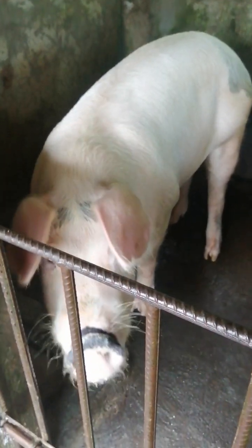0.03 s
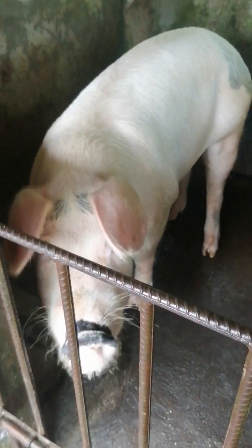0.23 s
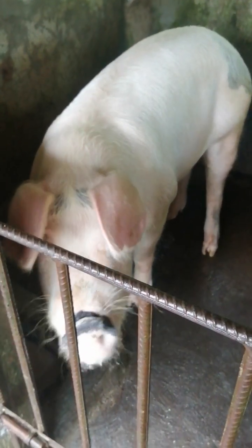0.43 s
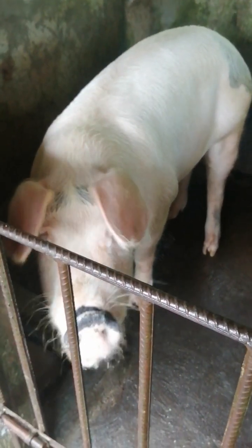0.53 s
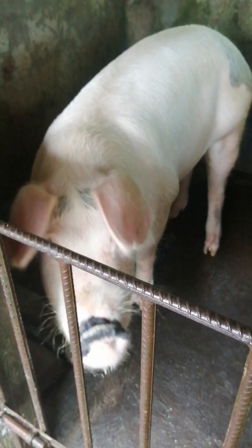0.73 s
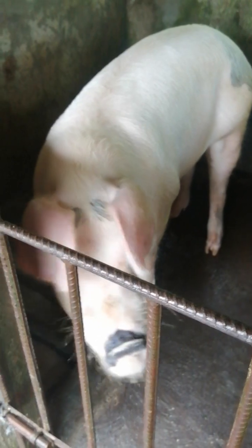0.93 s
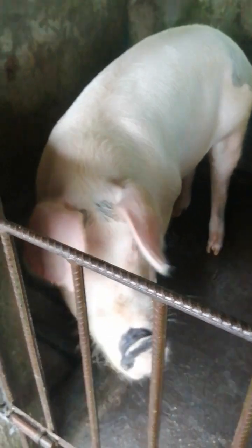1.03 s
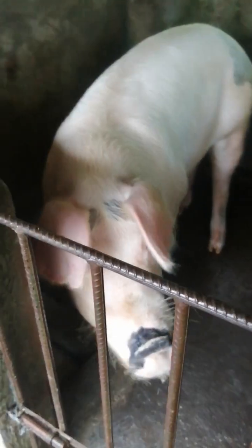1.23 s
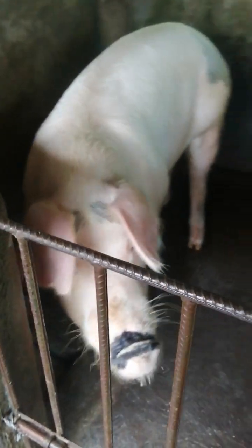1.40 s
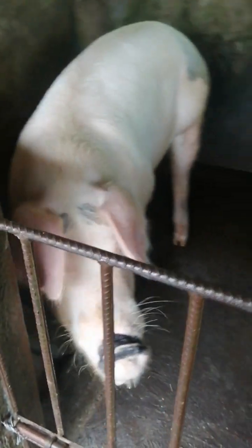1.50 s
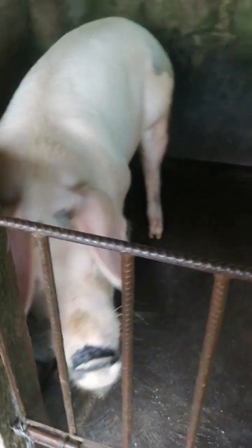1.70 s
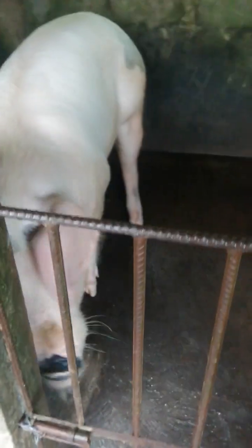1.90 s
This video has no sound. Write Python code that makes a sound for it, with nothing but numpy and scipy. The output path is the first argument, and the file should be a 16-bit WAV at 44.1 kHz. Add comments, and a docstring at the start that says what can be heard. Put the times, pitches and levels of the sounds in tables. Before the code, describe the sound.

A pig grunts close to the microphone in a small concrete pen. One short, throaty grunt is followed by a squeaky sniff, then two more grunts and a brief rustle, over faint hiss, ticks and small knocks.

```python
"""A pig in a small concrete pen, close to a handheld microphone with two unlike ports.
Shifting yard hiss, treble ticks and small knocks run from the start. At 0.2 s a short breath opens the
first grunt, a slow run of flaps in the throat that ends in a bright snap. A nostril squeak at 0.5 s
leads into a sniff. Two more grunts snap at 0.9 and 1.3 s, and from 1.7 s a rustle swells to the end."""
import sys
import numpy as np
from scipy import signal
from scipy.fft import rfft, irfft
from scipy.io import wavfile
from scipy.ndimage import uniform_filter1d

SR = 44100
rng = np.random.default_rng(int(sys.argv[2]) if len(sys.argv) > 2 else 0)


def to_wav(sig):
    """Store sig (one row per channel, or 1-D mono) as 16-bit WAV at the path in sys.argv[1].

    Samples outside -1..1 are clipped; the rate is SR.
    """
    pcm = np.clip(np.atleast_2d(sig), -1, 1) * 32767
    pcm = np.round(pcm).astype(np.int16)
    wavfile.write(sys.argv[1], SR, pcm.T)  # frames by channels


N = 85995
FRAMES, BIN_HZ = N // 128 + 5, np.fft.rfftfreq(512, 1 / SR)  # grid of the short-time noise spectra
CREST_DB = 5  # peak over rms of a short noise burst


def amp(db):
    return 10 ** (np.asarray(db) / 20)


def unit_rms(x):
    return x / np.sqrt(np.mean(x ** 2) + 1e-20)


def wander(length, span):
    """Random drift of unit rms, smoothed over span steps."""
    return unit_rms(uniform_filter1d(rng.standard_normal(length), size=span))


def at_hz(table, hz):
    """Read a table along a log-frequency axis."""
    freqs, values = np.transpose(table)
    return np.interp(np.log(hz + 1), np.log(freqs + 1), values)


def envelope(table, column):
    """Gain along time, falling to -90 dB within 12 ms outside the table."""
    times, db = np.array(table).T[[0, column]]
    return amp(np.interp(np.arange(N) / SR, [times[0] - .012, *times, times[-1] + .012], [-90, *db, -90]))


def resonate(x, hz, *widths):
    """Resonances of gain 1 in series, one per width in Hz, at a steady or moving frequency."""
    turn = np.exp(2j * np.pi * np.cumsum(hz * np.ones(len(x))) / SR)
    for width in widths:
        pole = np.exp(-np.pi * width / SR)
        x = 2 * (turn * signal.lfilter([1 - pole], [1, -pole], x / turn)).real
    return x


def ring(x, hz, width):
    """A resonance that a unit click rings with height 1."""
    return resonate(x, hz, width) / (2 * np.pi * width / SR)


def trail(x, seconds):
    """Each click leaves an exponential trail."""
    return signal.lfilter([1], [1, -np.exp(-1 / (seconds * SR))], x)


# How alike the surrounding noise is at the two ports: (frequency [Hz], correlation [-1 to 1])
PORT_LIKENESS = [(60, 0.97), (180, 0.64), (550, 0.88), (1650, -0.65), (4970, -0.19), (15000, 0.026)]
def stereo_noise(colour, patchy_db, flicker_db, drift_db=0):
    """Noise around the microphone, with patches in its spectrum and a wide-band flicker."""
    a, b, c, d, patches = rng.standard_normal((FRAMES, 257, 5)).T
    patches = unit_rms(uniform_filter1d(uniform_filter1d(patches, size=8, axis=0), size=16, axis=1))
    patches *= np.clip(BIN_HZ / 400, 0, 1)[:, None]  # smoother in the bass
    likeness = np.clip(at_hz(PORT_LIKENESS, BIN_HZ), -1, 1)[:, None]
    left = a + 1j * b
    right = likeness * left + np.sqrt(1 - likeness ** 2) * (c + 1j * d)
    db = at_hz(colour, BIN_HZ)[:, None] + patchy_db * patches + flicker_db * wander(FRAMES, 3) + drift_db
    return signal.istft(np.array([left, right]) * amp(db), nperseg=512, noverlap=384)[1][:, :N]


# The yard as heard from the pen: (frequency [Hz], relative level [dB])
YARD_COLOUR = [(25, -14), (60, -19), (95, -6.5), (140, -19.5), (280, -13), (600, -17), (1000, -21),
               (1300, -18), (2300, -16), (3400, -22.5), (5400, -15.5), (7000, -29.5), (9000, -34.5),
               (14000, -30.5), (14900, -48), (15600, -57)]
# Its drift, each band taken about its median: (time [s], bass [dB], middle [dB], treble [dB])
YARD_DRIFT = [(0.0, -56.5, -50.5, -51.5), (0.216, -72.5, -48, -56), (0.346, -43, -40, -51.5),
              (0.46, -57, -50, -52.5), (0.64, -65, -43, -51.5), (0.776, -63, -64, -54),
              (0.982, -88, -45.5, -54.5), (1.118, -53.5, -46, -50.5), (1.194, -58, -53, -57),
              (1.34, -38, -49, -52), (1.466, -55.5, -45.5, -52), (1.656, -56.5, -47, -55),
              (1.83, -60.5, -49, -54), (1.95, -60.5, -44, -45.5)]
def yard(level_db=-47.5, bass_from_hz=150, middle_from_hz=600.4, treble_from_hz=4080):
    """Patchy hiss all round; bass, middle and treble drift separately over a steady rumble."""
    times, *levels = np.transpose(YARD_DRIFT)
    t = np.arange(FRAMES) * 128 / SR
    drift_db = np.array([0 * t] + [np.interp(t, times, db - np.median(db)) for db in levels])
    band = np.searchsorted([bass_from_hz, middle_from_hz, treble_from_hz], BIN_HZ)
    hiss = stereo_noise(YARD_COLOUR, patchy_db=2.86, flicker_db=1.0, drift_db=drift_db[band])
    return amp(level_db) * hiss


# Ticks that stand clear of the hiss: (time [s], peak level [dB])
CLEAR_TICKS = [(0.026, -34), (0.1276, -31), (0.2131, -30.5), (0.2818, -35), (0.588, -41), (0.737, -30),
               (1.2336, -35.5), (1.3493, -50), (1.4431, -29.5), (1.487, -30), (1.542, -35), (1.5622, -30.5),
               (1.588, -31), (1.6184, -25.5), (1.707, -39), (1.7534, -55), (1.8292, -50.5), (1.8482, -27.5)]
# Spectrum of every tick: (frequency [Hz], relative level [dB])
TICK_COLOUR = [(6000, -13), (9000, -12.5), (12000, -7.5), (14000, -13.5), (14800, -4), (15600, 1.5)]
def ticks(t60_s=0.024, faint_per_s=120, faint_db=-51):
    """Tiny bright cracks, a few clear and many faint, dry at the microphone."""
    onsets = amp(faint_db + 1.5 * rng.exponential(1, N).clip(0, 3))
    onsets *= rng.random(N) < faint_per_s / SR
    for time, db in CLEAR_TICKS:
        onsets[round(time * SR)] = amp(db - CREST_DB)
    decays = signal.lfilter([1], [1, -amp(-60 / (t60_s * SR))], onsets)
    return decays * unit_rms(stereo_noise(TICK_COLOUR, patchy_db=4.8, flicker_db=0))


# Small knocks nearby in the pen: (time [s], peak level [dB], pitch [Hz], t60 [s])
PEN_KNOCKS = [(0.028, -39.5, 1050, 0.048), (.166, -44, 1380, 0.11), (.172, -43, 583, 0.15),
              (.627, -39.5, 660, 0.15), (.693, -27.5, 1024, 0.03), (0.719, -47, 3860, 0.091),
              (1.135, -38, 207, 0.031), (1.516, -39.5, 2170, 0.08), (1.543, -39, 285, 0.099),
              (1.61, -41, 2090, 0.15), (1.7, -35.5, 1044, 0.055), (1.729, -34, 780, 0.044),
              (1.73, -34.5, 1280, 0.017)]
def knocks(attack_s=0.0014):
    """Each knock is a short fuzzy ring at its own pitch."""
    out, t = np.zeros(N + SR), np.arange(SR // 4) / SR
    for time, db, hz, t60 in PEN_KNOCKS:
        shape = amp(db - CREST_DB - 60 * t / t60) * np.minimum(t / attack_s, 1)
        burst = resonate(rng.standard_normal(len(t)) * shape, hz, .12 * hz, .3 * hz)
        out[round(time * SR):][:len(t)] += unit_rms(burst) * np.sqrt(np.mean(shape ** 2))
    return out[:N]


# Breaths close to the microphone, one list each: (time [s], whistle level [dB], hiss level [dB])
BREATHS = [
    [(0.18, -75, -67), (0.186, -43, -70.5), (0.192, -42, -52), (0.2, -61, -41.5), (0.25, -56, -63)],
    [(0.558, -36, -47), (0.568, -51, -41.5), (0.616, -62, -48), (0.634, -71, -57), (0.68, -52, -45.5)],
    [(0.7, -57, -52), (0.722, -74, -49.5), (0.768, -77, -51.5), (0.774, -55, -41.5), (0.8, -86, -64)],
]
# Nostril resonances of whistle and hiss: (frequency [Hz], width [Hz], relative level [dB])
WHISTLE_MODES = [(2280, 670, 15), (1000, 450, 9)]
HISS_MODES = [(3460, 900, -2.4), (4430, 820, -0.45), (5130, 680, -0.3)]
def sniff(grit_db=2.0):
    """Air drawn through the nostrils: a fuzzy whistle over a gritty hiss."""
    air = rng.standard_normal(N) * amp(grit_db * wander(N, 120))
    out = np.zeros(N)
    for column, modes in ((1, WHISTLE_MODES), (2, HISS_MODES)):
        tube = sum(amp(db) * unit_rms(resonate(air, hz, width, width)) for hz, width, db in modes)
        out += sum(envelope(breath, column) for breath in BREATHS) * unit_rms(tube)
    return out


# The pig at close range, a row per grunt; the lead-in is its first two flaps:
# (snap time [s], flap period [s], effort [dB], lead-in gain [dB], its growth per flap [dB],
#  its delay [s], its mouth opening [dB], nostril blip [dB], snap push [dB], upper snout [dB],
#  rasp [dB], crack [dB], four mouth resonances [Hz], their four gains [dB])
PIG_GRUNTS = [(.289, .0325, -19, -19, 3, -.004, -15, -3.5, -0.5, 3.5, -32.5, -17.5, 1000, 1490, 2380, 3150, 0, -5, -5.5, -8.5),
              (.875, .0334, -22.5, -11, 3.5, .001, -26.5, -8, -1.5, -1.5, -32, -11.5, 1030, 1750, 2440, 3555, -4, -6.5, 4.5, 2),
              (1.310, .0333, -21, -8, -18, .003, -29, -24, -4.5, -1.5, -24, -33, 897, 1390, 2290, 3350, -6.5, -7, -8, 0.5)]
# Throat flaps, the fourth being the snap: (strength [dB], mouth opening [dB], lead-in opening [0-1])
THROAT_FLAPS = [(-1.5, 20, 1), (0, 1, 1), (-0.5, -5, 0.31), (0, 5.5, 0.09), (-19.5, 2, 0)]
# Resonances of nose and throat, and of the chest: (frequency [Hz], width [Hz], gain [dB])
SNOUT_MODES = [(207, 38.7, -4), (289.3, 60, 2.5), (387.6, 46, 0.5), (468, 63.6, 2.5)]
CHEST_MODES = [(57.7, 25, -59), (89, 24.6, -69.5)]
def grunt(snap_s, period_s, effort_db, lead_db, growth_db, delay_s, lead_open_db,
          blip_db, snap_db, upper_db, rasp_db, crack_db, *mouth):
    """Soft pushes ring the snout and chest; sharp clicks and puffs of air ring the mouth as it opens."""
    length, margin_s, jitter_db, murmur_db = SR // 2, .01, .8, -37.5
    upper_snout_hz, nostril_hz, crack_hz = 350, 2550, 5420
    push, click = np.zeros((2, length))
    for k, (strength_db, open_db, lead_share) in enumerate(THROAT_FLAPS):
        leading = k < 2
        at = round((k * period_s + margin_s + leading * delay_s) * SR)
        db = effort_db + strength_db + jitter_db * rng.standard_normal()
        db += leading * (lead_db + k * growth_db)
        push[at] = amp(db + (k == 3) * snap_db)
        click[at] = amp(db + open_db + lead_share * lead_open_db)
    snout_air, mouth_air = rng.standard_normal((2, length))

    breathy = push + amp(murmur_db) * trail(push, seconds=0.022) * snout_air  # turbulence after each flap
    snout = sum((-1) ** k * amp(db + (hz > upper_snout_hz) * upper_db) * ring(breathy, hz, width)
                for k, (hz, width, db) in enumerate(SNOUT_MODES))
    snout = np.roll(snout, -round(0.00235 * SR))  # the snout sounds just ahead of the click
    soften = np.hanning(round(0.0015 * SR))
    snout = np.convolve(snout, soften / soften.sum())[:length]
    chest = sum(amp(db) * ring(ring(push, hz, 52), hz, width) for hz, width, db in CHEST_MODES)

    mouth_shut = np.arange(length) < (2.5 * period_s + margin_s) * SR
    blip = amp(blip_db) * ring(resonate(push * mouth_shut, nostril_hz, 330, 330), nostril_hz, width=200)
    crack = amp(crack_db) * ring(resonate(click, crack_hz, 1200), crack_hz, width=220)
    voice = snout + chest + blip + crack

    puffs = click + amp(rasp_db) * trail(click, seconds=0.023) * mouth_air
    flick = 1 - 0.18 * trail(click > 0, seconds=0.0015)  # the top resonance starts low and flicks up
    for hz, db in zip([*mouth[:3], mouth[3] * flick], mouth[4:]):
        voice += amp(db) * ring(resonate(puffs, hz, 610, 600), hz, width=230)
    out, start = np.zeros(N), round((snap_s - 3 * period_s - margin_s) * SR)
    out[start:start + length] = voice
    return out


def squeak(start_s=.529, length_s=.014, from_hz=2620, to_hz=2400, level_db=-28, pop_s=.526, pop_db=-32):
    """A low pop and a falling, wavering nostril squeak open the sniff."""
    progress = np.clip((np.arange(N) / SR - start_s) / length_s, 0, 1)
    hz = (from_hz + (to_hz - from_hz) * progress) * (1 + 0.038 * wander(N, 60))
    swell = np.sqrt(np.sin(np.pi * progress).clip(0))
    tone = swell * np.sin(2 * np.pi * np.cumsum(hz) / SR)
    pop = ring(signal.unit_impulse(N, round(pop_s * SR)), hz=1000, width=81)
    return amp(level_db) * tone + amp(pop_db) * pop


# The closing rustle: (time [s], level [dB])
RUSTLE_SWELL = [(1.68, -43), (1.724, -94), (1.73, -41), (1.756, -45.5), (1.9, -36), (1.95, -51)]
# Its spectrum: (frequency [Hz], relative level [dB])
RUSTLE_SPECTRUM = [(290, -64), (500, -32), (879, 2), (1610, 1), (4500, -12.5), (5430, -6), (7800, -26),
                   (14700, -16), (15800, -4)]
def rustle():
    """Flickering noise, dry at the microphone, that starts, breaks off and swells."""
    return envelope(RUSTLE_SWELL, 1) * unit_rms(stereo_noise(RUSTLE_SPECTRUM, patchy_db=2.2, flicker_db=2.0))


# Decay between the pen's walls: (frequency [Hz], t60 [s])
PEN_DECAY = [(60, 0.4), (300, 0.23), (1000, 0.37), (3000, 0.32), (8000, 0.23)]
# Colour of the reflections: (frequency [Hz], gain [dB])
WALL_COLOUR = [(60, 5), (300, 3.5), (1000, -2), (3000, -6), (8000, 2)]
def pen(x, shared_below_hz=500):
    """Sparse reflections off close concrete walls; both ports share the bass tail."""
    taps = np.zeros((2, SR // 2))
    arrivals = np.arange(120, SR // 2 - 20, 20) + rng.integers(0, 20, (2, (SR // 2 - 121) // 20))
    np.put_along_axis(taps, arrivals, rng.choice([-1., 1.], arrivals.shape), 1)
    hz, t, spectra = signal.stft(taps, SR, nperseg=256)
    spectra[0] = np.where(hz[:, None] < shared_below_hz, spectra[1], spectra[0])
    decay = amp(-60 * t / at_hz(PEN_DECAY, hz)[:, None])
    tail = signal.istft(spectra * decay, SR, nperseg=256)[1]
    colour = amp(at_hz(WALL_COLOUR, np.fft.rfftfreq(tail.shape[1], 1 / SR)))
    tail = irfft(rfft(tail) * colour) / np.linalg.norm(tail[0])
    return signal.fftconvolve(x[None], tail, axes=1)[:, :N]


def scene():
    """Pig and knocks close and centred, the walls answering; hiss, ticks and rustle around them."""
    near = sum(grunt(*row) for row in PIG_GRUNTS) + knocks()
    breath = sniff() + squeak()
    return near + breath + rustle() + pen(near + amp(-0.5) * breath) + ticks() + yard()


# The microphone's two unlike ports: (frequency [Hz], left over right [dB])
PORT_BALANCE = [(60, -6), (92, -4.5), (140, -2), (210, -2), (330, -6.5), (500, -6), (770, -2), (1170, -3.5),
                (1790, -9.5), (2740, -11.5), (4190, -6.5), (6410, -13.5), (9810, 9), (15000, -13)]
def record(dry, band_limit_hz=15680):
    """The handheld microphone: each port has its own colour, and the highest treble is cut."""
    tilt_db = at_hz(PORT_BALANCE, np.fft.rfftfreq(N, 1 / SR)) / 2
    ports = irfft(rfft(dry) * amp([tilt_db, -tilt_db]), N)
    lowpass = signal.firwin(1023, band_limit_hz, window=("kaiser", 9), fs=SR)
    return signal.oaconvolve(ports, lowpass[None], "same")


dry = scene()
out = record(dry)
to_wav(out)
```